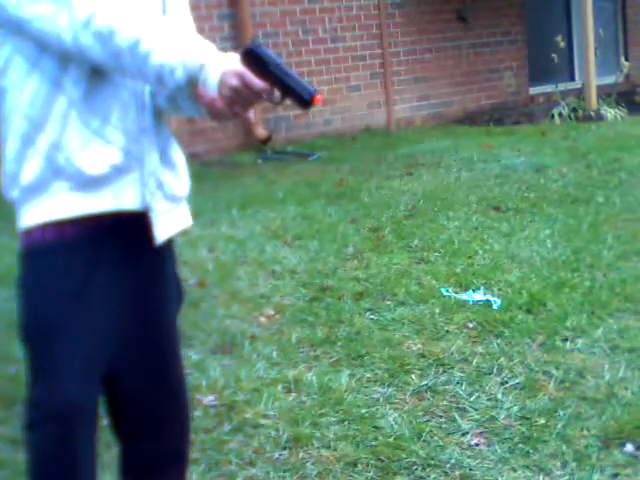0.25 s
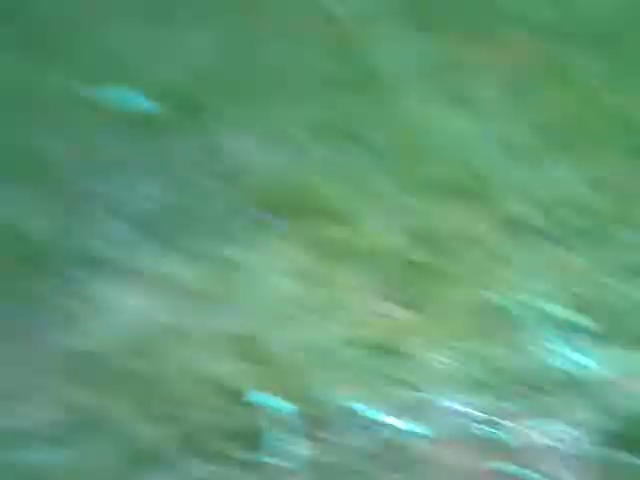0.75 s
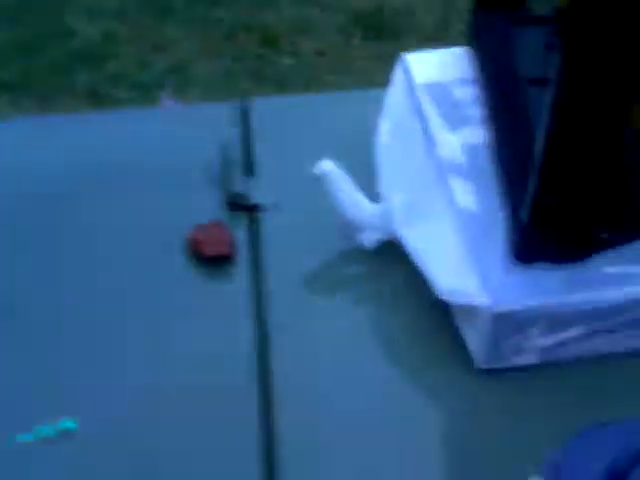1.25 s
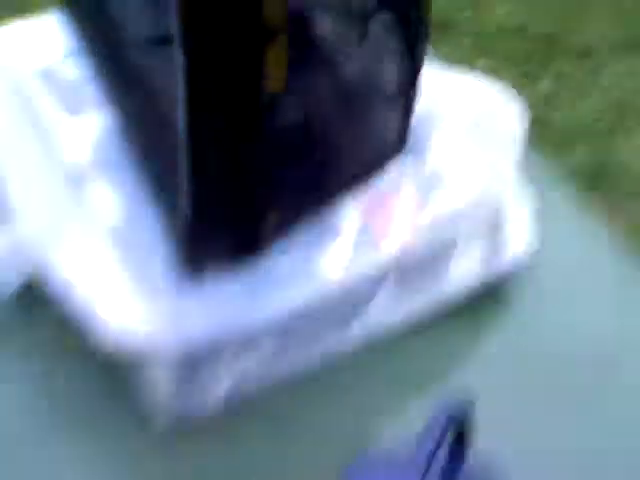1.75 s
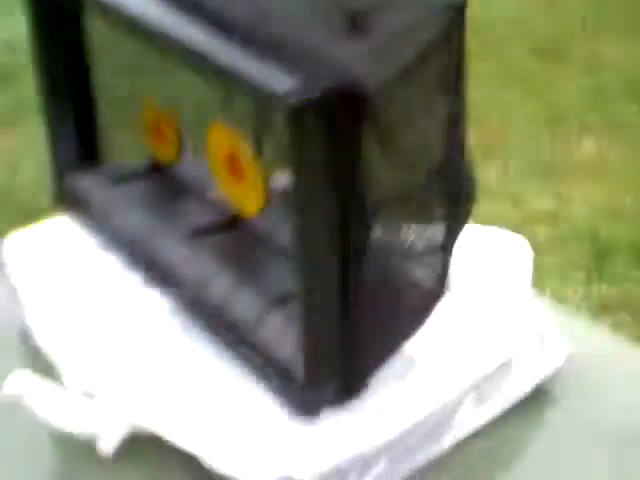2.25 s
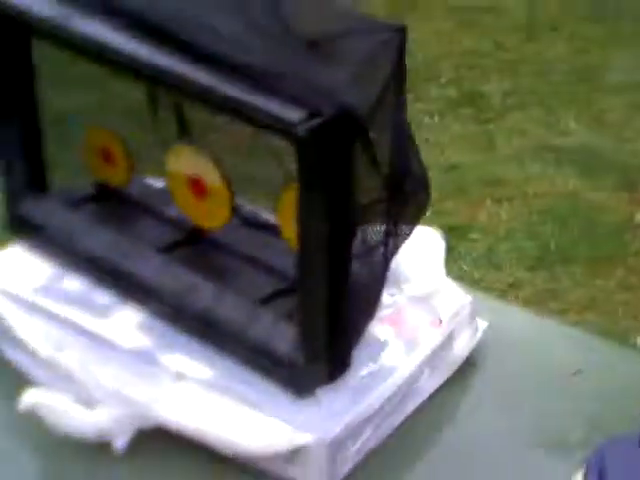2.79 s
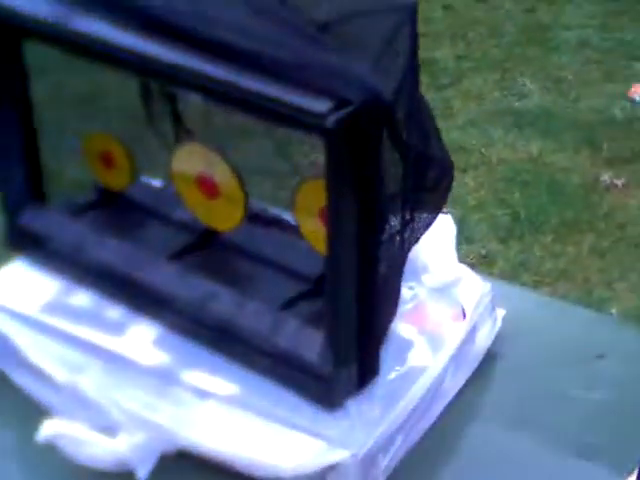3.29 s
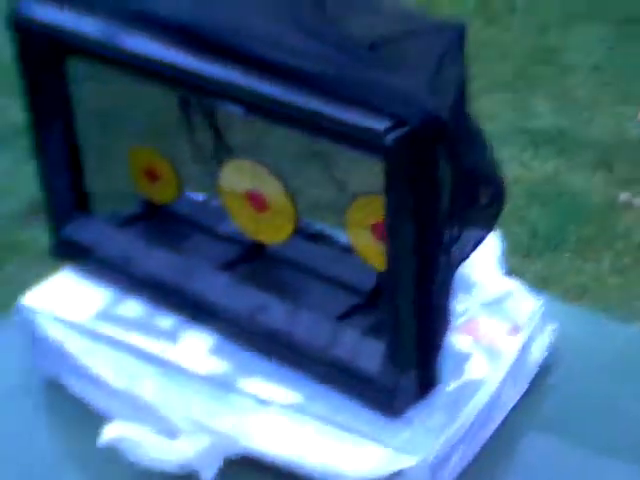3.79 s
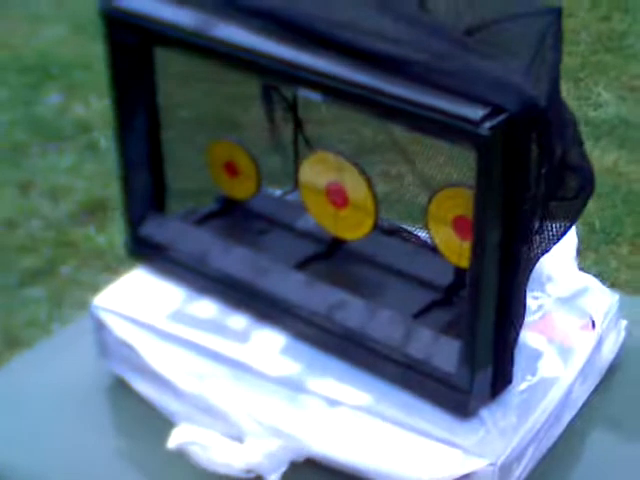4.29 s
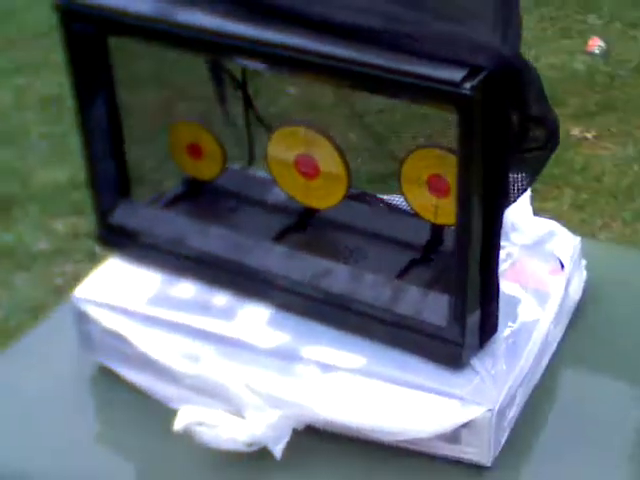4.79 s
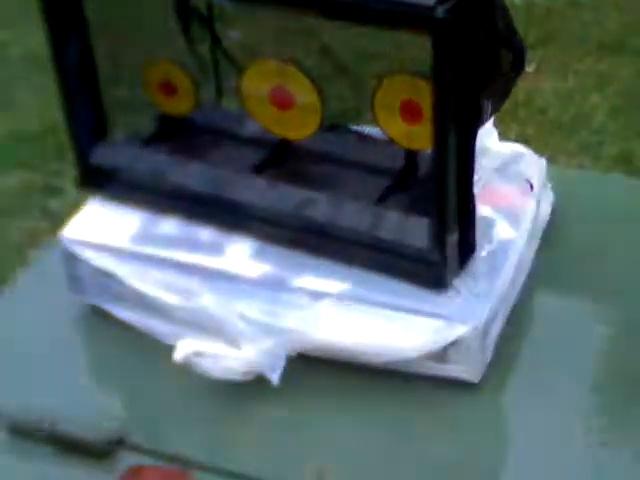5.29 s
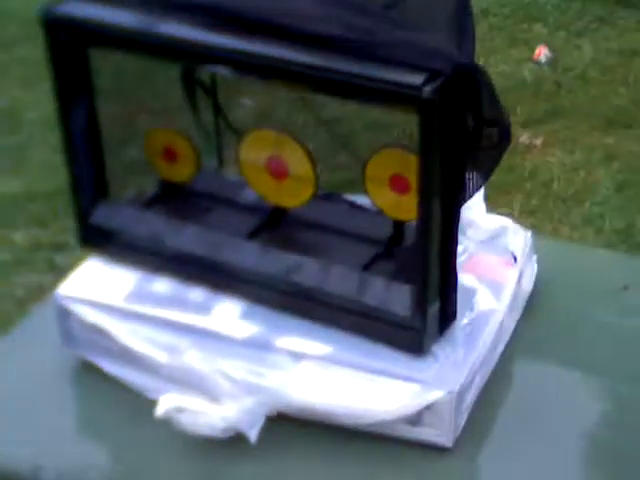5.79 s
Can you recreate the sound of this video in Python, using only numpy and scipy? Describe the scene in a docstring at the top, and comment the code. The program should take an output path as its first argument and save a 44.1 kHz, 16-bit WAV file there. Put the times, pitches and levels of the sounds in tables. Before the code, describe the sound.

Soft, steady outdoor hiss opens, dull on top as through a cheap camera microphone, with a very faint wavering low hum. At about 0.54 seconds a plastic spring pistol snaps close by: a tiny trigger tick, then piston and slide knocks crowded into a few hundredths of a second, hollow, rattling and harshly overloaded, with a slight puff of air. Short slaps return from hard and rough walls, and a thin diffuse tail fades. Hiss continues until a second snap at 1.5 seconds and a third at 1.9, equally sharp but with weaker echoes. From about 2.5 to 4.6 only the hiss remains, drifting slightly in brightness. At 4.6 a fourth snap lands, drier and thinner, with barely any trigger tick, thump or return. A faint lower drone lies under the brighter hiss, which eases gently until the end near 6 seconds.

```python
"""Four sharp plastic-pistol shots snap in a yard, close to a narrow-band camera microphone that overloads.
Each shot is a trigger tick, piston and slide knocks with repeats off the ground, a small settling bounce
and two soft puffs of air; hard and rough walls then return it as short noise bursts, over a diffuse yard tail.
Behind lies shaped noise as outdoor hiss, with a drifting bright band, and two faint low sine drones."""
import sys
import numpy as np
from scipy import signal
from scipy.fft import rfft, irfft
from scipy.io import wavfile
from scipy.ndimage import uniform_filter1d

SR = 44100
rng = np.random.default_rng(int(sys.argv[2]) if len(sys.argv) > 2 else 0)


def to_wav(sig):
    """Store sig (one row per channel, or 1-D mono) as 16-bit WAV at the path in sys.argv[1].

    Samples outside -1..1 are clipped; the rate is SR.
    """
    pcm = np.clip(np.atleast_2d(sig), -1, 1) * 32767
    pcm = np.round(pcm).astype(np.int16)
    wavfile.write(sys.argv[1], SR, pcm.T)  # frames by channels


N = 266805

# Colour of the outdoor hiss. Each row: frequency in Hz, relative level in dB per Hz.
HISS_SPECTRUM = [(12, -40.5), (20, -14), (27, -33.5), (49, -21), (97, -13), (270, -9), (340, -9.5),
                 (437, -8), (928, 0), (1930, -2.5), (2370, -2), (3260, -10), (3910, -11), (4190, -23),
                 (4700, -52.5), (6110, -93), (10300, -120)]
# Course of the background. Each row: time in seconds, hiss level in dB, bright band centre in Hz,
# bright band level in dB, tilt of the hiss's low part in dB.
AIR_COURSE = [(0.0, -33.5, 2520, -42.5, 2), (0.64, -32.5, 2700, -43.5, 0.5), (0.91, -32, 2440, -39.5, -1.5),
              (1.97, -31.5, 2587, -42, 0), (2.16, -31, 2500, -37.5, -1.5), (3.02, -33, 2420, -38.5, -0.5),
              (4.65, -32, 2724, -33, -2.5), (5.11, -33, 2714, -35.5, -1), (6.05, -34.5, 2624, -37.5, 0.5)]
# The two faint tones. Each row: time in seconds, pitch in Hz, level in dB.
EARLY_DRONE = [(0, 339.5, -55), (.7, 343, -59), (1.4, 339.7, -60), (1.9, 333, -75.5)]
LATE_DRONE = [(4.1, 210.6, -73.5), (4.5, 207.1, -53), (5.8, 197.5, -56), (6.06, 193, -59)]

# The shots. Each row: start in seconds, piston, slide, bounce, trigger and thump levels in dB,
# ring length as a share, ground delay in seconds, level of the piston off the ground in dB,
# ring of the piston off the ground in Hz, ring of the slide off the ground in Hz, puff level in dB,
# sharp return level in dB, smeared return level in dB.
SHOTS = [(0.544, -0.5, -1.5, -6, -6.5, -7.5, 1, 0.0037, -2, 2096, 2200, -19.5, -13.5, -20),
         (1.5042, -1, -2.5, -7.5, -14.5, -13, 1.1, .0030, -1, 2327, 3170, -29, -20.5, -21.5),
         (1.9064, 0, -1, -11.5, -8, -14, .95, .0029, 1, 1902, 2364, -25, -23.5, -21.5),
         (4.6000, -3, 0, -13.5, -31, -27, 0.73, 0.0046, -10.5, 1610, 1946, -41, -32, -35)]
# Parts that knock in every shot; the shot's levels and ring share are applied on top.
# Each row: delay in seconds, level in dB, ring in Hz, t60 in seconds, thump level in dB.
TRIGGER_KNOCKS = [(-.005, -9, 1670, .016, -11.5), (-.0023, -1, 1948, 0.018, -9)]
PISTON_KNOCKS = [(0, 0, 2750, 0.027, -8)]
SLIDE_KNOCKS = [(0.0101, 0, 3013, 0.019, -3.5)]
BOUNCE_KNOCKS = [(.0158, 0.0044, 2600, .022, -5)]  # the slide settles
# Modes of the hollow grip and barrel. Each row: frequency in Hz, width in Hz, level in dB.
SHELL_MODES = [(210.2, 68, -6.5), (333.4, 60, -12), (538, 60, -2), (632, 52, -2), (770, 86, -1),
               (1088, 45, -7), (1420, 120, -4)]
# Colour of the rattling crack. Each row: frequency in Hz, relative level in dB per Hz.
CRACK_SPECTRUM = [(60, -39.5), (281, -16.5), (602, -7.5), (1000, -6.5), (1360, 9.5), (2570, -4),
                  (3380, -2.5), (3910, 5.5), (4600, -18), (5980, -52), (10100, -120)]

# Colour of the sound the yard sends back. Each row: frequency in Hz, relative level in dB per Hz.
RETURN_SPECTRUM = [(120, -59), (200, -22), (494, -3.5), (752, -13), (1610, 0.5), (2620, 0.5), (3830, -3.5),
                   (4360, -20.5), (4600, -53), (5980, -70), (10100, -120)]
# Returns off flat faces. Each row: delay in seconds, level in dB on top of the shot's.
SHARP_RETURNS = [(0.0336, 1), (0.0422, -1), (.093, -4.5), (0.1089, -3.5)]
# Returns off rough faces. Each row: delay in seconds, level in dB on top of the shot's.
SMEARED_RETURNS = [(.021, -5), (.048, 2.5), (.055, -1.5), (.063, -0.27), (.097, -10), (.112, -4.5)]

# Repeats off the ground
GROUND_THUMP_DB, PISTON_GROUND_T60_S = 6, 0.026
SLIDE_GROUND_DB, SLIDE_GROUND_T60_S = -2.6, 0.019
PUFF_DELAY_S, PUFF_PEAK_S, SLIDE_PUFF_DB = 0.0028, 0.0035, -5.5
SHARP_RISE_S, SHARP_T60_S = 0.0006, 0.016
SMEARED_RISE_S, SMEARED_T60_S = 0.0027, 0.083
YARD_T60_S, YARD_DB = 0.75, -30
# Microphone band edge, clipping level, resting offset, upper edge after the overload
MIC_HZ, OVERLOAD, OFFSET, EDGE_HZ = 4351, 0.71, -0.0031, 16300


def amp(db):
    """Turns dB into a linear gain."""
    return 10 ** (np.asarray(db) / 20)


def evened(x):
    """Brings x to rms 1."""
    return x / np.sqrt(np.mean(x ** 2) + 1e-20)


def read(points, hz):
    """Reads a spectrum curve in dB along a log frequency axis."""
    f, value = np.transpose(points)
    return np.interp(np.log(hz + 1), np.log(f + 1), value)


def add(mix, s, sound):
    """Lays a sound into the mix at s seconds, cut off at the end of the mix."""
    part = mix[round(s * SR):][:len(sound)]
    part += sound[:len(part)]


def coloured(x, spectrum):
    """Filters x by the spectrum and brings it to rms 1."""
    gain = amp(read(spectrum, np.fft.rfftfreq(len(x), 1 / SR)))
    return evened(irfft(rfft(x) * gain, len(x)))


def resonate(x, hz, width_hz):
    """Shifts the curve hz down to zero, smooths, and shifts back: a resonance of gain 1."""
    turn = np.exp(2j * np.pi * np.cumsum(hz * np.ones(len(x))) / SR)
    r = np.exp(-np.pi * width_hz / SR)
    smooth = signal.lfilter([1 - r], [1, -r], x / turn + 1e-18)
    return 2 * (turn * smooth).real


def dying(t, t60):
    """Exponential decay that falls 60 dB in t60 seconds."""
    return np.exp(-np.log(1000) * t / t60)


def air():
    """Smooth distant hiss with faint patches, plus a broad bright band that drifts in pitch."""
    s, hiss_db, band_hz, band_db, low_db = np.transpose(AIR_COURSE)
    t = np.arange(N) / SR

    frames, hz = N // 256 + 5, np.fft.rfftfreq(1024, 1 / SR)
    a, b, patches = rng.standard_normal((frames, 513, 3)).T
    # smoothed over neighbouring frequencies, then over time
    patches = uniform_filter1d(patches, 10, axis=0)
    patches = evened(uniform_filter1d(patches, 12, axis=1))
    # the tilt fades out above about 700 Hz
    low = np.interp(np.arange(frames) * 256 / SR, s, low_db) / (1 + (hz[:, None] / 700) ** 4)
    level_db = read(HISS_SPECTRUM, hz)[:, None] + 1.1 * patches + low
    hiss = signal.istft((a + 1j * b) * amp(level_db), nperseg=1024, noverlap=768)[1][:N]

    centre = np.interp(t, s, band_hz)
    band = resonate(rng.standard_normal(N), centre, 530)
    band = resonate(band, centre, 530)
    return amp(np.interp(t, s, hiss_db)) * evened(hiss) + amp(np.interp(t, s, band_db)) * evened(band)


def drone(rows):
    """A faint sine that wavers in pitch and strength, as from a far engine."""
    s, hz, db = np.transpose(rows)
    t = np.arange(N) / SR
    waver, throb = (evened(uniform_filter1d(rng.standard_normal(N), 3000)) for _ in range(2))
    pitch = np.interp(t, s, hz) + 7.0 * waver
    tone = np.sqrt(2) * np.sin(2 * np.pi * np.cumsum(pitch) / SR)
    return tone * amp(np.interp(t, s, db, left=-120, right=-120) + 1.4 * throb)


def knocks():
    """Lists (s, dB, Hz, t60 s, thump dB): every shot plays the same parts, piston and slide also off the ground."""
    rows = []
    for (s, piston_db, slide_db, bounce_db, trigger_db, thump_db, ring_share,
         ground_s, ground_db, piston_hz, slide_hz, *_) in SHOTS:
        direct = ((TRIGGER_KNOCKS, trigger_db), (PISTON_KNOCKS, piston_db),
                  (SLIDE_KNOCKS, slide_db), (BOUNCE_KNOCKS, bounce_db))
        for parts, level in direct:
            for delay, db, hz, t60, body_db in parts:
                rows.append((s + delay, level + db, hz, ring_share * t60, thump_db + body_db))

        grounded = ((PISTON_KNOCKS[0], ground_db, piston_hz, PISTON_GROUND_T60_S),
                    (SLIDE_KNOCKS[0], slide_db + SLIDE_GROUND_DB, slide_hz, SLIDE_GROUND_T60_S))
        for (delay, _, _, _, body_db), db, hz, t60 in grounded:
            rows.append((s + delay + ground_s, db, hz, ring_share * t60,
                         thump_db + body_db + GROUND_THUMP_DB))
    return rows


def shell_thump(t, draws):
    """The hollow shell sounds as decaying sines; each mode starts upward or downward at random."""
    thump = np.zeros(len(t))
    for draw, (hz, width_hz, db) in zip(draws, SHELL_MODES):
        mode = np.sin(2 * np.pi * hz * t) * np.exp(-np.pi * width_hz * t)
        thump += np.sign(draw) * amp(db) * mode
    return thump


def pistol():
    """Each knock rings the plastic briefly, over a rattling crack and the thump of the hollow shell."""
    out, t = np.zeros(N), np.arange(4096) / SR
    rise = 1 - np.exp(-t / 0.0004)
    for s, db, hz, t60, thump_db in knocks():
        wobble_noise, crack_noise, mode_draws = rng.standard_normal((3, len(t)))
        wobble = evened(uniform_filter1d(wobble_noise, 40))  # loose parts make the ring unsteady
        ring = np.sin(2 * np.pi * np.cumsum(hz * (1 + 0.1 * wobble)) / SR)
        crack = coloured(crack_noise, CRACK_SPECTRUM)
        snap = rise * dying(t, t60) * (ring + 0.51 * crack)
        add(out, s, amp(db) * (snap + amp(thump_db) * shell_thump(t, mode_draws)))
    return out


def puffs():
    """A low push of air follows piston and slide: pressure rises fast and leaks away."""
    out, u = np.zeros(N), np.arange(4096) / SR / PUFF_PEAK_S
    push = u * np.exp(1 - u)
    for s, *_, db, _sharp_db, _smeared_db in SHOTS:
        add(out, s + PUFF_DELAY_S, amp(db) * push)
        slide_delay = SLIDE_KNOCKS[0][0]
        add(out, s + PUFF_DELAY_S + slide_delay, amp(db + SLIDE_PUFF_DB) * push)
    return out


def echoes():
    """Lists (s, dB, rise s, t60 s): the same walls and fences answer every shot."""
    rows = []
    for s, *_, sharp_db, smeared_db in SHOTS:
        rows += [(s + d, sharp_db + db, SHARP_RISE_S, SHARP_T60_S) for d, db in SHARP_RETURNS]
        rows += [(s + d, smeared_db + db, SMEARED_RISE_S, SMEARED_T60_S) for d, db in SMEARED_RETURNS]
    return rows


def returns():
    """Flat and rough surfaces send each shot back as short bursts of coloured noise."""
    out, t = np.zeros(N), np.arange(8192) / SR
    for s, db, rise_s, t60 in echoes():
        burst = coloured(rng.standard_normal(len(t)), RETURN_SPECTRUM)
        burst = burst + 0.2 * evened(resonate(burst, 520, 60))  # the shell's lowest strong ring carries
        envelope = dying(t, t60) * (1 - np.exp(-t / rise_s))
        add(out, s, amp(db) * envelope * burst)
    return out


def yard(shots):
    """Diffuse tail: the shots convolved with decaying noise that builds up over the first echoes."""
    t = np.arange(SR) / SR
    build_up = 1 - np.exp(-t / 0.062)
    tail = coloured(rng.standard_normal(SR), RETURN_SPECTRUM) * dying(t, YARD_T60_S) * build_up
    return amp(YARD_DB) * signal.fftconvolve(shots, tail / np.linalg.norm(tail))[:N]


def scene():
    """Background air and drones, with the shots and what the yard makes of them."""
    background = air() + drone(EARLY_DRONE) + drone(LATE_DRONE)
    shots = pistol()
    return (background + shots + puffs() + returns() + yard(shots))[None]


def record(dry):
    """The narrow microphone band comes first; the overload after it adds treble only at the peaks."""
    mic_band = signal.firwin(301, MIC_HZ, window=("kaiser", 9), fs=SR)[None]
    narrow = signal.oaconvolve(dry, mic_band, "same")
    clipped = np.clip(narrow, -OVERLOAD, OVERLOAD)
    upper_edge = signal.firwin(511, EDGE_HZ, window=("kaiser", 9), fs=SR)[None]
    return OFFSET + signal.oaconvolve(clipped, upper_edge, "same")


dry = scene()
out = record(dry)
to_wav(out)
```